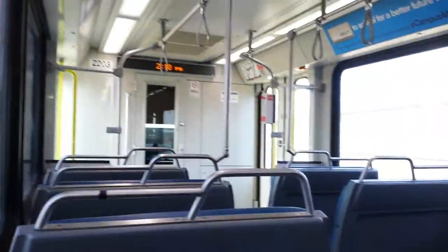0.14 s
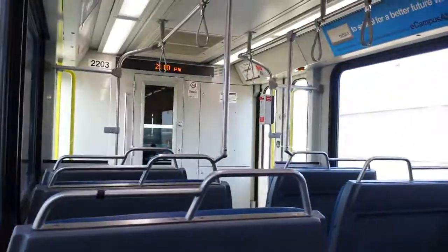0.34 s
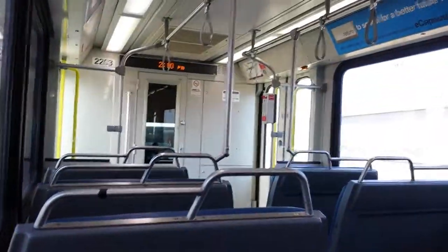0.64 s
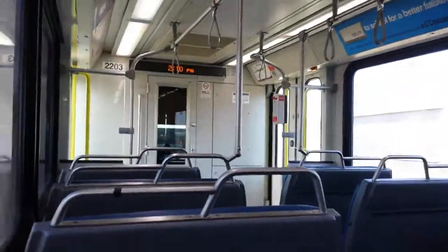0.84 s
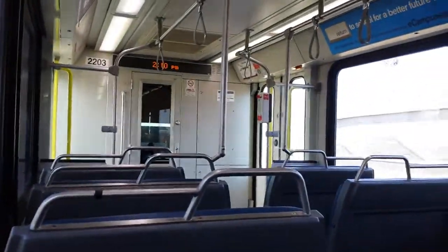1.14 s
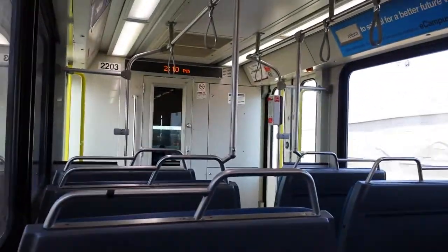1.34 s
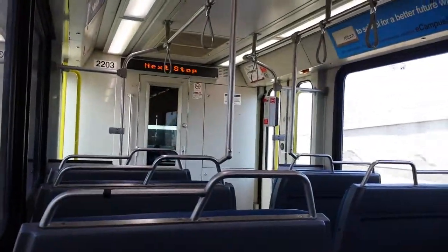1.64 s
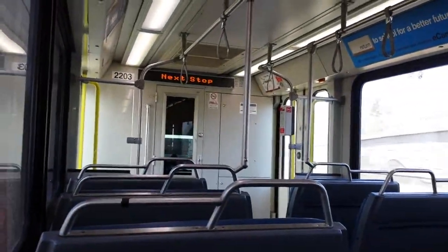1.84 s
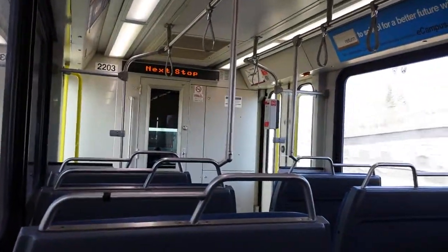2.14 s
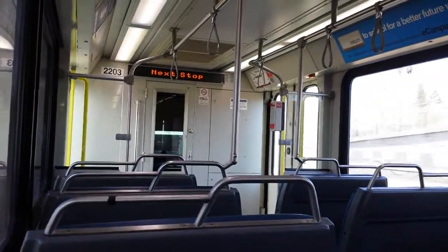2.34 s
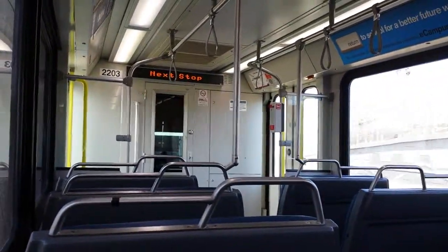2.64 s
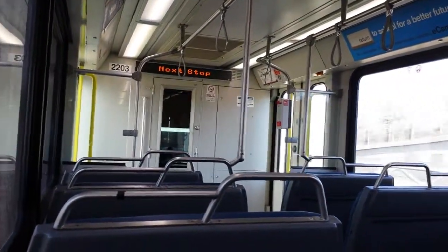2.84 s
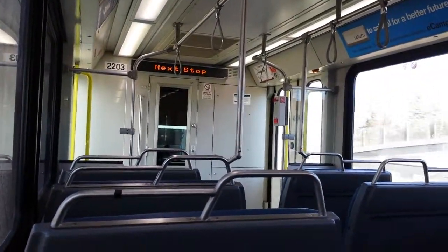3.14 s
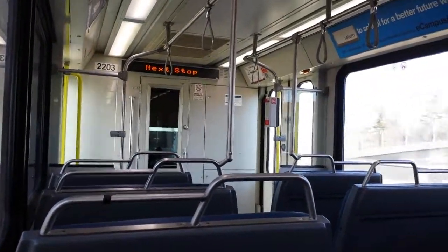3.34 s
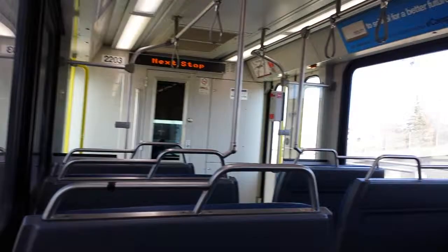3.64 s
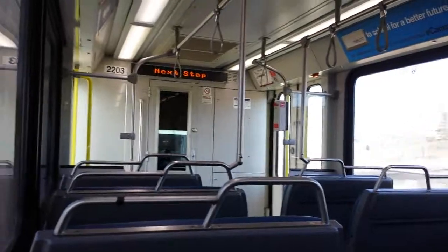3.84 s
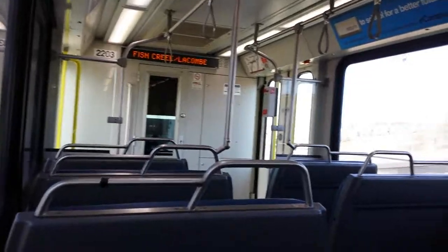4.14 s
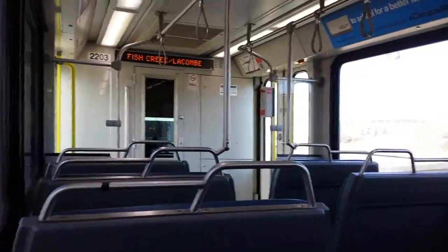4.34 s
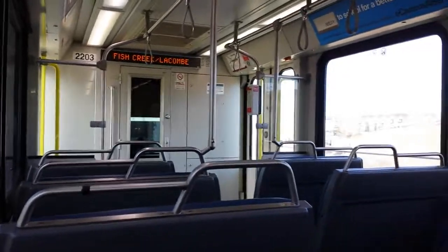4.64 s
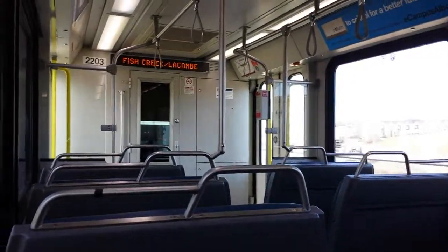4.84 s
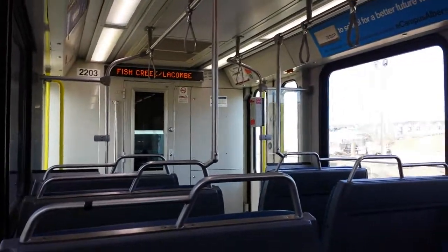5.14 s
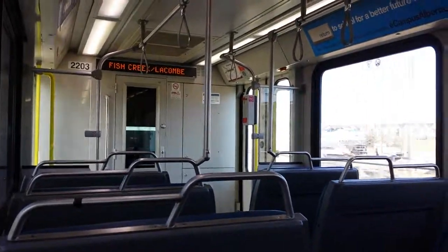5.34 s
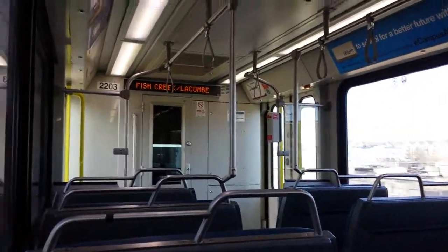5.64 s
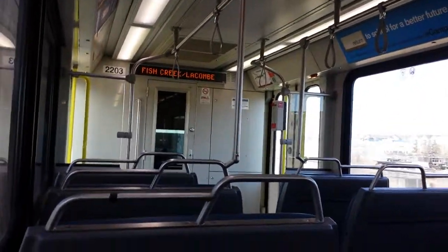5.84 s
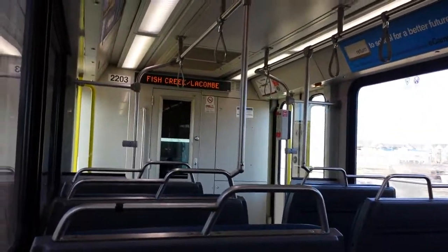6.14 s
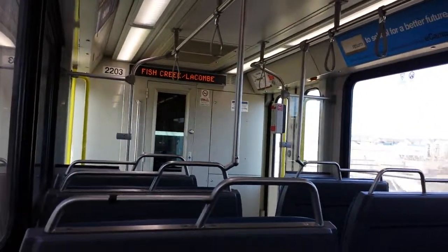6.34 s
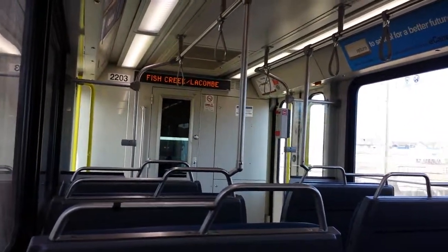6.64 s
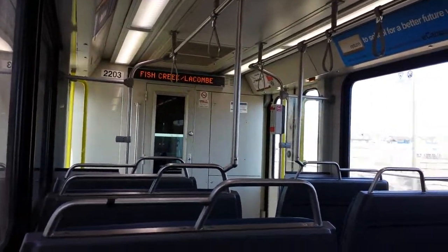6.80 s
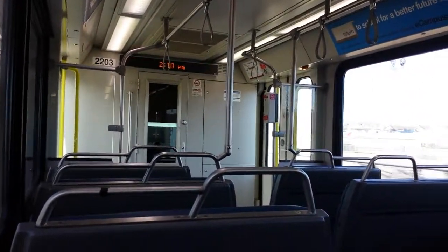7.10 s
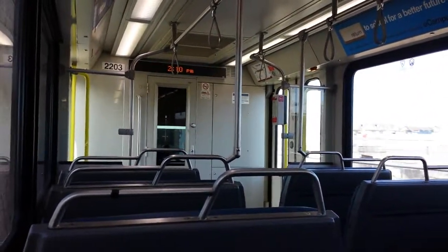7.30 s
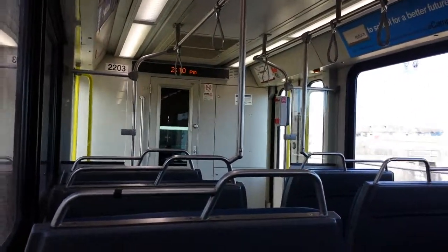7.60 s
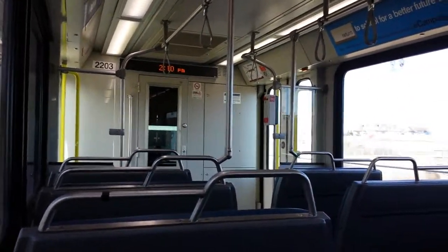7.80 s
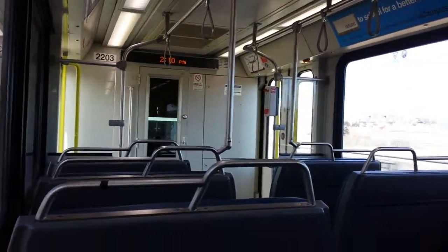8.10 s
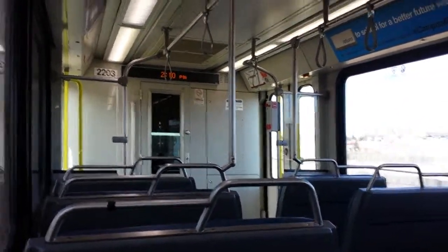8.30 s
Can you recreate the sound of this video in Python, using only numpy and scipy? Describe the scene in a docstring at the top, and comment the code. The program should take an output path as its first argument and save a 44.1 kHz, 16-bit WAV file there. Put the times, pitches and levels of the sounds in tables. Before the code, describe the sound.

Continuous light rail cabin ambience, heard by a microphone among the seats: low body rumble, hollow booming pulses, mid-pitched rail roar and a soft duct hiss. The electric drive sings a wavering tone that rises slightly as speed builds. A few dry clicks come mostly from the left, then a quick rattle and rustle, a short sagging groan, and stronger rolling noise to the close.

```python
"""Light rail car gathering speed

Inside an empty car. Noise through body and cabin resonances makes the floor boom and the wheels and rails
roar, with brief sine swells of low and middle pitch within it; two sliding sines groan once. Motor, gears and
fainter drive tones are sines that rise with speed and swell on cabin modes. Coloured noise makes the
ventilation hiss, the ticks of loose fittings and one rustle. A quick gain control and a treble cut follow.
"""
import sys
import numpy as np
from scipy import signal
from scipy.fft import rfft, irfft, next_fast_len
from scipy.io import wavfile

SR = 44100
rng = np.random.default_rng(int(sys.argv[2]) if len(sys.argv) > 2 else 0)


def store_wav(level_fs):
    """Save 16-bit WAV to argv[1]."""
    pcm = np.round(np.clip(np.atleast_2d(level_fs), -1, 1) * 32767)
    wavfile.write(sys.argv[1], SR, pcm.T.astype(np.int16))


N = 373086
T_S = np.arange(N) / SR
SIZE = next_fast_len(N)
HZ = np.maximum(np.arange(SIZE // 2 + 1) * SR / SIZE, 1)   # FFT bins; 1 Hz floor for the log axis


def from_db(db):
    """Decibels to gain."""
    return 10 ** (np.asarray(db) / 20)


def rms_one(x):
    """Scale to rms 1."""
    return x / np.sqrt(np.mean(x ** 2) + 1e-20)


def in_time(rows):
    """Columns of a time table, interpolated at every sample."""
    s, *columns = np.transpose(rows)
    return [np.interp(T_S, s, column) for column in columns]


def at_hz(points, hz):
    """Frequency table interpolated on a log-frequency axis."""
    table_hz, values = np.array(points).T
    return np.interp(np.log(hz), np.log(table_hz), values)


def drift(rate_hz):
    """Noise through a two-pole lowpass at rate_hz, rms 1, computed at every 40th sample."""
    r = np.exp(-2 * np.pi * rate_hz * 40 / SR)
    noise = rng.standard_normal(N // 40 + 2002)
    slow = signal.lfilter([1], [1, -2 * r, r * r], noise)[2000:]   # drop the settling
    return np.interp(np.arange(N) / 40, np.arange(len(slow)), rms_one(slow))


def resonances(modes):
    """Gain over frequency of independent resonances, whose powers add."""
    power = 0
    for hz, width_hz, db in modes:
        detuning = 2 * (HZ - hz) / width_hz
        power = power + from_db(2 * db) / (1 + detuning ** 2) ** 2
    return np.sqrt(power)


def stereo_ports():
    """Gains of shared and opposed sound at the two ports, from left-right likeness and balance."""
    # left-right correlation of the diffuse field: f/Hz, likeness/1
    likeness = [(30, .97), (60, .995), (176, .99), (320, .9), (430, .62), (770, .57), (1040, .02),
                (1700, -.3), (2300, .17), (3380, -.12), (4000, 0)]
    # left-right balance of the diffuse field: f/Hz, L-R level/dB
    lean = [(30, 3.1), (113, 2.7), (176, 1.8), (280, -.1), (370, .8), (500, 4.5), (600, 3), (800, 3.8),
            (1040, 2.8), (1620, 5.6), (2170, 6.4), (3700, -.5), (5500, 2.6), (7070, -3), (9500, -6)]
    alike = np.clip(at_hz(likeness, HZ), -1, 1)
    tilt = from_db(at_hz(lean, HZ) / 2) ** np.array([[1], [-1]])
    return tilt * np.sqrt(1 + alike), tilt * np.sqrt(1 - alike) * [[1], [-1]]


SHARED, OPPOSED = stereo_ports()


def diffuse(gain):
    """Reverberant noise of a given colour: alike at both ports in the bass, unrelated in the top; mid rms 1."""
    real, imag = rng.standard_normal((2, 2, len(HZ)))
    mid, side = gain * (real + 1j * imag)
    pair = irfft(SHARED * mid + OPPOSED * side, SIZE)[:, :N]
    return pair / np.sqrt(np.mean(pair.mean(axis=0) ** 2))


def ventilation(rough):
    """Steady duct hiss as coloured noise, shaken by the rail roughness, with one slight swell."""
    # hiss spectral density: f/Hz, level/dB
    air_colour = [(760, -43.5), (1300, -10), (1560, -9), (1950, -7), (2250, -7.5), (2500, -10), (2900, -13),
                  (3400, -17.5), (4600, -19), (6200, -17), (7100, -18), (8000, -24), (8900, -29.5),
                  (9500, -38), (10000, -41.5), (10900, -82), (11400, -125)]
    air_db, air_db_per_s = -32.5, -0.03
    rush_s, rush_lasts_s, rush_db = 4.3, 0.45, 0.5
    rush = rush_db * np.exp(-((T_S - rush_s) / rush_lasts_s) ** 2)
    level_db = air_db + air_db_per_s * T_S + rush + 0.46 * rough + 0.43 * drift(25)
    return from_db(level_db) * diffuse(from_db(at_hz(air_colour, HZ)))


def undertone():
    """Broad body noise at a constant level."""
    # body noise spectral density: f/Hz, level/dB
    undertone_colour = [(18, -18.5), (40, -9.5), (60, 2), (400, -7), (1500, -18.5), (2500, -32.5),
                        (6000, -120)]
    return from_db(-27) * diffuse(from_db(at_hz(undertone_colour, HZ)))


def ticks():
    """Loose fittings: noise bursts that crack, then ring more softly, each with a dull body and a crisp snap."""
    # impacts of fittings: t/s, body level/dB, snap level/dB, L-R level/dB, ring t60/s
    tick_rows = [(2.129, -47, -84, -.5, .03), (2.731, -39, -44, -9, .04), (3.043, -40, -46, -12, .04),
                 (3.7564, -34, -44, -3, 0.08), (3.84, -35, -85, -2, 0.1), (4.2474, -39, -80, -9, 0.07),
                 (4.691, -36, -47, -1, 0.08), (4.705, -41, -54, -2, .06), (6.212, -45, -50, -10, .05),
                 (7.149, -47, -85, 0, .03), (8.324, -46, -88, -5, .04)]
    # dull part, spectral density: f/Hz, level/dB
    body_colour = [(1500, -40), (2600, -13), (5000, -6), (8300, -2), (10800, -8), (11800, -68)]
    # crisp part, spectral density: f/Hz, level/dB
    snap_colour = [(5000, -31), (8000, -5), (11500, 10), (15000, -4)]
    crack_t60_s, ring_db = .012, -8   # ring start relative to crack
    out, t = 0, np.arange(SR // 3) / SR
    for column, colour in enumerate([body_colour, snap_colour]):
        envelope = np.zeros((2, N))
        for s, *levels_db, pan_db, ring_t60_s in tick_rows:
            i = round(s * SR)
            decay = from_db(-60 * t / crack_t60_s) + from_db(ring_db - 60 * t / ring_t60_s)
            port_db = levels_db[column] + np.array([[pan_db], [-pan_db]]) / 2
            envelope[:, i:i + len(t)] += (decay * from_db(port_db))[:, :N - i]
        bursts = envelope * rng.standard_normal((2, N))
        gain = rms_one(from_db(at_hz(colour, HZ)))
        out = out + irfft(gain * rfft(bursts, SIZE), SIZE)[:, :N]
    return out


def rustle():
    """Something loose rustles in two pushes: gated coloured noise with an uneven level."""
    # pushes: start t/s, end t/s, level/dB
    pushes = [(3.83, 3.93, -39), (3.93, 4.01, -39.5)]
    # rustle spectral density: f/Hz, level/dB
    rustle_colour = [(1500, -40), (3000, 1), (5500, -2.5), (8000, -5), (9800, -16), (11000, -58),
                     (11500, -100)]
    edge_s = .025   # linear ramp, centred on start and end
    sounding = 0
    for start, end, db in pushes:
        gate = np.clip(np.minimum(T_S - start, end - T_S) / edge_s + .5, 0, 1)
        sounding = sounding + from_db(db) * gate
    return from_db(1.1 * drift(23)) * sounding * diffuse(from_db(at_hz(rustle_colour, HZ)))


def whine():
    """Motor, gear and shaft sines locked to a wavering speed; they swell on each cabin mode and flutter."""
    # motor tone against time: t/s, f/Hz
    motor_rows = [(0, 536.7), (2.115, 555.2), (4.23, 571.3), (6.345, 586.0), (8.46, 599.8)]
    # cabin modes passed by the rising tones: f/Hz, width/Hz, left tone level/dB
    cabin = [(541, 10, -30.5), (550, 12, -30), (565, 10, -31), (574, 5, -31), (581, 6, -28), (590, 5, -32),
             (597, 8, -32), (630, 8, -33), (641, 12, -24.5), (657, 6, -30), (663, 9, -28.5), (649, 6, -34),
             (669, 5, -33), (678, 5, -26), (682.5, 7, -24.5), (686.5, 4, -24.5), (1258, 14, -42),
             (1285, 16, -33), (1385, 30, -45), (1640, 45, -45), (1695, 30, -44), (1750, 30, -46),
             (1785, 55, -44)]
    # fainter drive tones, one cabin mode each: ratio to motor tone/1, mode f/Hz, width/Hz, left level/dB
    shafts = [(1.5, 885, 10, -34), (1.635, 924, 18, -37)]
    gear_ratio = 1.1634   # tooth mesh over motor tone
    waver_hz, jitter_hz = 0.4, 1.7   # slow and quick unevenness of the drive speed, rms at the motor tone
    right_db, flutter_rms_db = -6, 1.5
    hz, = in_time(motor_rows)
    uneven_hz = hz + waver_hz * drift(1.44) + jitter_hz * drift(9.1)
    phase = 2 * np.pi * np.cumsum(uneven_hz) / SR
    # ratio to motor tone, share of a full turn over which port phases scatter, modes
    tones = [(1, .2, cabin), (3, 1, cabin), (gear_ratio, .15, cabin), (2 * gear_ratio, 1, cabin)]
    tones += [(ratio, .2, [mode]) for ratio, *mode in shafts]
    out = 0
    for order, spread, modes in tones:
        port_phase = spread * rng.uniform(0, 2 * np.pi, (2, 1))   # the room gives each port its own phase
        flutter_db = flutter_rms_db * np.array([drift(4), drift(4)])
        mode_gain = np.interp(order * hz, HZ, resonances(modes))
        level = mode_gain * from_db(flutter_db + [[0], [right_db]])
        out = out + np.sqrt(2) * level * np.sin(order * phase + port_phase)
    return out


def brief_swells_and_groan():
    """Brief swells within the rolling noise, and a groan sliding down: wavering sines in bell envelopes."""
    # swells of low and middle pitch: peak t/s, f/Hz, peak level/dB, 1/e length/s
    swell_rows = [(0.554, 148.2, -18.5, 0.19), (.66, 92, -16, 0.12), (0.998, 152.3, -25, 0.36),
                  (1.55, 147, -26, .2), (2.153, 153, -29, 0.27), (2.405, 591, -24.5, 0.38),
                  (2.753, 582, -31, 0.27), (3.303, 570, -29, 0.41), (3.45, 598, -26, 0.33),
                  (3.7, 588, -23, 0.18), (4.21, 157, -18.5, 0.23), (4.6, 96, -18, 0.23),
                  (4.75, 134, -19, 0.13), (5.1, 550, -26, .3), (5.55, 80, -17.5, 0.24),
                  (5.71, 192, -22, .12), (5.904, 560, -23.5, .3), (6.35, 151.5, -21, .2),
                  (6.655, 90, -16, 0.11), (6.8, 545, -25, 0.32), (7.42, 148.7, -20, 0.3),
                  (7.75, 94, -20, 0.27), (7.97, 148, -19.5, 0.38), (8.05, 86, -19.5, 0.48)]
    # groan notes: peak t/s, f at peak/Hz, peak level/dB, 1/e length/s
    groan_rows = [(5.34, 228.5, -24.5, 0.21), (5.39, 400, -24.5, .2)]
    groan_hz_per_s = -220
    out = 0
    for rows, slide_hz_per_s in ((swell_rows, 0), (groan_rows, groan_hz_per_s)):
        for s, hz, db, length_s in rows:
            note_hz = hz + slide_hz_per_s * (T_S - s) + 2.53 * drift(4.22)
            phase = 2 * np.pi * np.cumsum(note_hz) / SR + rng.uniform(0, 2 * np.pi)
            bell = np.exp(-(2 * (T_S - s) / length_s) ** 2)
            out = out + from_db(db) * bell * np.sin(phase)
    return out * from_db([[1.2], [-1.2]])   # leans left


def rolling(rough):
    """Rail noise through groups of body, cabin, rail and wheel resonances, each group swelling on its own."""
    # swells before share: t/s, upper drone/dB, wheel roar/dB, upper wheel ring/dB
    ride = [(0, -0.71, -2, -6.5), (.56, -0.54, -4.5, -2.5), (1.13, 0.28, -0.5, -1), (1.69, -1.5, -0.5, 0.5),
            (2.25, 0.51, 0, 0.3), (2.82, -0.089, -1.5, 0.6), (3.38, -0.54, 0.5, -0.5),
            (3.94, -0.6, -1, -0.8), (4.51, 0.22, -0.5, -0.5), (5.07, 0.1, 0.5, 0.7), (5.63, 1.1, 0.5, 0.2),
            (6.2, 1.3, 1, 1.5), (6.76, 0.21, 1, 0), (7.32, -.6, 0.5, 0.8), (7.89, 0.36, 1.5, .4),
            (8.46, .8, 2.5, 3.5)]
    # swells before share: t/s, floor thud/dB, cabin boom/dB, lower drone/dB
    rumble = [(0, -0.5, -2, -1.5), (.6, .5, 0, -.5), (1, -3, 1, -1.5), (1.4, -2, -0.5, -1),
              (1.8, -0.5, -.5, -1), (2.2, -1, 2, .5), (2.55, -3, -2.5, 1), (3, 0, 1, 2),
              (3.4, -3.5, -0.5, -1), (3.75, 1, -0.5, -2), (4.15, -1, 0.5, 1.5), (4.6, 2.5, -.5, 1),
              (5, .5, 0.5, -1), (5.4, .5, -1.5, -0.5), (5.8, -2, -1.5, 1), (6.2, 0, -1, -1.5),
              (6.6, -1, -.5, 1.5), (7, 0, 0, -.5), (7.4, 2, 0, 1), (7.8, 3, 1.5, 1), (8.46, 2, 0, 0)]
    # swells before share: t/s, body bounce/dB, low rail roar/dB, high rail roar/dB, lower wheel ring/dB
    roll = [(0, 2.5, -8, -3.5, -6), (.56, -2, -5.5, -5, -3), (1.13, 2, -3, -2.5, -3),
            (1.69, 0, -1, 0, -0.5), (2.25, -2, 0, 1.5, 0), (2.82, 0, -2, -1.5, 0), (3.38, -1, -0.5, 2, 0),
            (3.94, 2.5, -2.5, -0.5, -0.5), (4.51, 3, -2.5, 2, 1.5), (5.07, 1, 2, 1, -1.5),
            (5.63, 1, -0.5, 0.5, 1.5), (6.2, 3, 1.5, 0, 0.5), (6.76, -1, 1, 1.5, 0.5),
            (7.32, -0.5, 2, 1.5, 2.5), (7.89, 3.5, 3.5, 0.5, .5), (8.46, 1.5, 0, 1, 2.5)]
    # resonance groups, in the order of swells below: f/Hz, width/Hz, level within group/dB
    bodies = [
        [(57.5, 18, 0)],
        [(81.2, 16, -3), (92, 10, -4), (112.2, 16.5, -1.5)],
        [(150.3, 22, 0), (177.4, 26, -3)],
        [(225.2, 70, -0.5), (285.5, 45, -1.5)],
        [(339, 48, 0), (386, 75, -3.5), (447, 45, -1.5)],
        [(496, 41, -3), (524, 24, -2), (544.6, 19, 0.5)],
        [(565, 22, 0), (584.7, 12, 0.5), (607.7, 25, -1.5)],
        [(649, 52, -1), (687, 62, 0.6), (736.5, 46, -1.5), (782, 58, -3)],
        [(844, 46, -1), (887, 37, -0.5), (924, 33, 1), (981, 54, -5.5), (1031, 78, -1)],
        [(1135, 100, -1.5), (1236, 104, 0), (1308, 256, -6)],
    ]
    # one row per group: level/dB, share of its swell followed/1
    follows = [(-29, 1.3), (-23, 1.27), (-22.5, 1.3), (-27, 1.4), (-28, 1.5), (-28.5, 1.17), (-27, 1),
               (-26, 1.33), (-31, 1.23), (-29.5, 1.17)]
    drone, roar, ring = in_time(ride)
    thud, boom, low_drone = in_time(rumble)
    bounce, low_rail, high_rail, low_ring = in_time(roll)
    swells = [bounce, thud, boom, low_drone, drone, low_rail, high_rail, roar, low_ring, ring]
    out = 0
    for (db, share), swell_db, modes in zip(follows, swells, bodies):
        out = out + from_db(db + share * swell_db + 0.5 * rough) * diffuse(resonances(modes))
    return out


def scene():
    """Ventilation, body noise, fittings, drive, brief swells, groan and rolling noise summed."""
    rough = drift(12)   # rail roughness shakes body and air ducts together
    background = ventilation(rough) + undertone()
    fittings = ticks() + rustle()
    return background + fittings + whine() + brief_swells_and_groan() + rolling(rough)


def record(dry):
    """A quick gain control eases the loudest swells down, then a lowpass cuts the top."""
    power = signal.lfilter([.001], [1, -.999], (dry ** 2).mean(axis=0))   # about 23 ms average
    loud = np.sqrt(power + 1e-12)
    gain = (1 + (loud / 0.21) ** 2) ** -.3
    stop_hz, stop_db = 15000, 70
    lowpass = signal.cheby2(24, stop_db, stop_hz, fs=SR, output="sos")
    return signal.sosfilt(lowpass, from_db(1.03) * gain * dry)


dry = scene()
out = record(dry)
store_wav(out)
```